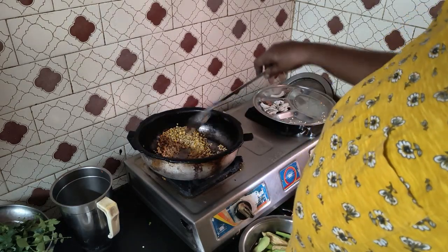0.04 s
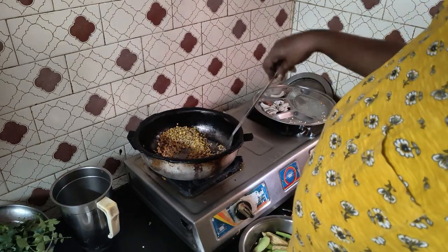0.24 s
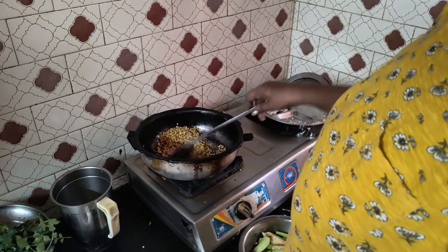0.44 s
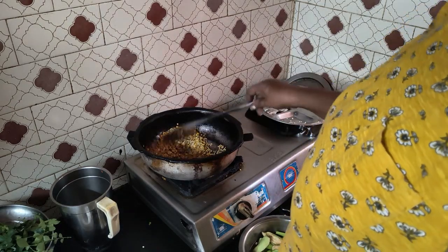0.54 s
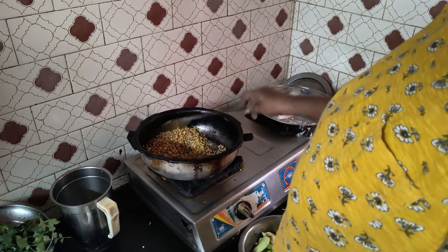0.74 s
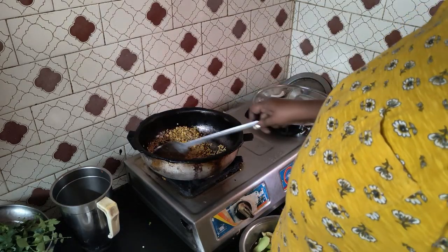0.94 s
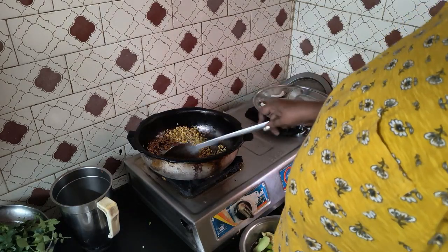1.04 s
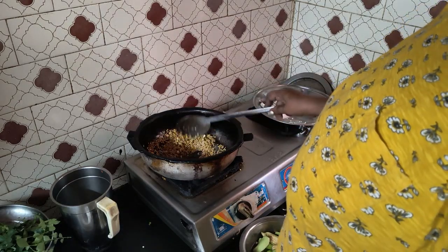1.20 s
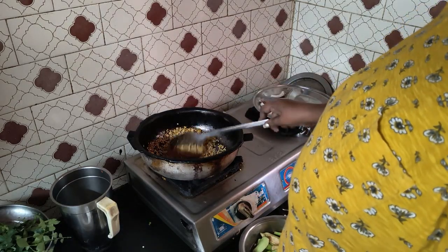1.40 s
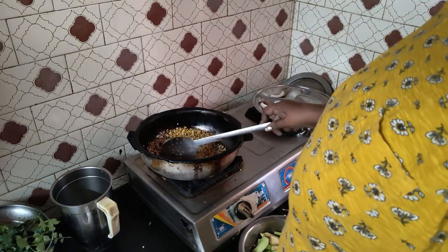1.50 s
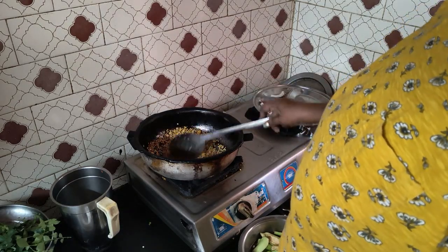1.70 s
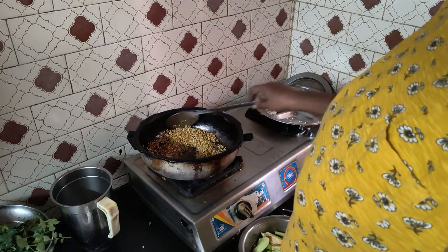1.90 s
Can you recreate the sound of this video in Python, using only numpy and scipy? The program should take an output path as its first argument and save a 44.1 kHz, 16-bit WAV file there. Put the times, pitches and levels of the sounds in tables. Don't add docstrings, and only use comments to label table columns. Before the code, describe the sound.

Steel ladle knocks and scrapes a metal pan while dry seeds rattle, over a faint stove hum

```python
import sys
import numpy as np
from scipy import signal
from scipy.fft import rfft, irfft, next_fast_len
from scipy.io import wavfile

SR = 44100
rng = np.random.default_rng(int(sys.argv[2]) if len(sys.argv) > 2 else 0)


def amplitude_ratio(level_db):
    exponent = np.asarray(level_db, float) / 20
    return 10 ** exponent


def unload_wav(signal):
    wavfile.write(
        sys.argv[1],
        SR,
        np.round(np.clip(np.atleast_2d(signal).T, -1, 1) * 32767).astype(np.int16),
    )


N = 85995
CONTACT_S = .003


def rms_one(x):
    return x / np.sqrt(np.mean(x ** 2) + 1e-20)


def in_time(rows):
    s, *columns = np.transpose(rows)
    return [np.interp(np.arange(N) / SR, s, c) for c in columns]


def at_hz(points, hz):
    points = np.array(points)
    return np.interp(np.log(hz), np.log(points[:, 0]), points[:, 1])


def sides(db):
    return amplitude_ratio(np.array([db / 2, -db / 2]))


def drift(rate):
    step = 40
    r = np.exp(-2 * step * np.pi * rate / SR)
    white = rng.standard_normal(N // step + 2002)
    slow = signal.lfilter([1], [1, -2 * r, r * r], white)[2000:]
    return np.interp(np.arange(N) / step, np.arange(len(slow)), rms_one(slow))


def decay(clicks, t60):
    return signal.lfilter([1], [1, -amplitude_ratio(-60 / (t60 * SR))], clicks + 1e-18)


def ring(clicks, hz, t60, lead):
    pole = amplitude_ratio(-60 / (t60 * SR)) * np.exp(2j * np.pi * hz / SR)
    z = signal.lfilter([1], [1, -pole], clicks + 1e-18)
    return np.array([(z * np.exp(.5j * lead)).imag, (z * np.exp(-.5j * lead)).imag])


def body(modes, clicks, stages):
    out = 0
    for k, (hz, db, t60, pan, lead) in enumerate(modes):
        for gain, share, extra in stages:
            tone = ring(clicks(k), hz, t60 * share + extra, lead)
            out = out + amplitude_ratio(db) * sides(pan)[:, None] * gain * tone
    return out


def ticks(rate, uneven_db):
    sizes = amplitude_ratio(uneven_db * np.minimum(rng.exponential(1, N), 5)) * rng.choice([-1, 1], N)
    return sizes * (rng.random(N) < rate / SR)


# pitch_hz, likeness (0 to 1)
LIKENESS = [(60, 0.64), (300, 0.91), (700, 0.4), (2000, 0.049), (5000, 0.033), (12000, 0.086)]


def bands(white, gain, count=18):
    out, edges = 0, (30 * 2 ** np.arange(0, 9.4, .5))[-count - 1:]
    for k, (low, high) in enumerate(zip(edges, edges[1:])):
        band = signal.butter(2, [low, high], "band", fs=SR, output="sos")
        mid, side = signal.sosfilt(band, white[k % 2])
        hz = np.sqrt(low * high)
        alike = np.clip(at_hz(LIKENESS, hz), -1, 1)
        stereo = np.sqrt(1 + alike) * mid + np.sqrt(1 - alike) * side * [[1], [-1]]
        out = out + gain(hz) * stereo
    return out


def kitchen(x):
    t60_s, wall_cut_hz = 0.37, 9500
    size = next_fast_len(N + SR)
    z = np.exp(-2j * np.pi * np.arange(size // 2 + 1) / size)
    dull = np.exp(-2 * np.pi * wall_cut_hz / SR)
    response = np.zeros((2, len(z)), complex)
    for k, lag in enumerate((rng.uniform(.008, .03, 12) * SR).astype(int)):
        loop = amplitude_ratio(-60 * lag / SR / t60_s) * (1 - dull) / (1 - dull * z) * z ** lag
        response[k % 2] += (-1) ** (k // 2) * loop / (1 - loop)
    return irfft(rfft(x, size) * response, size)[:, :N]


# pitch_hz, level_db
ROAR_COLOUR = [(30, -42), (65, -5.5), (140, -3.5), (400, -5.5), (1500, -23.5), (2800, -13.5), (6000, -28),
               (16000, -14)]
# pitch_hz, width_hz, level_db
BURNER_HUMS = [(71.2, 8, -67), (234.6, 7.1, -68.5), (270, 21, -65.5)]


def flame():
    together = drift(2.5)

    def gain(hz):
        return amplitude_ratio(at_hz(ROAR_COLOUR, hz) + 1.2 * (together + drift(10)))
    out = amplitude_ratio(-56) * rms_one(bands(rng.standard_normal((2, 2, N)), gain))
    for hz, width_hz, db in BURNER_HUMS:
        out = out + amplitude_ratio(db) * rms_one(ring(rng.standard_normal(N), hz, 7.1 / width_hz, 0.187))
    return out * sides(0.88)[:, None]


# start_s, level_db
PUSHES = [(0.0, -60), (0.102, -56.5), (0.146, -77), (0.244, -57.5), (0.57, -56.5), (0.732, -80),
          (0.792, -57), (0.9, -78), (1.112, -58), (1.14, -80), (1.292, -72), (1.492, -51.5), (1.672, -70),
          (1.738, -47), (1.786, -73), (1.95, -70)]


def stove():
    mode_hz, width_hz = 141.6, 7.6
    db, = in_time(PUSHES)
    white = [1, 1j] @ rng.standard_normal((2, N))
    z = signal.lfilter([1], [1, -np.exp(-np.pi * width_hz / SR)], white)
    steady = z / (np.abs(z) + 0.26 * np.std(z))
    tone = (steady * np.exp(2j * np.pi * mode_hz * np.arange(N) / SR)).real
    return amplitude_ratio(db) * rms_one(tone) * sides(1.8)[:, None]


# start_s, level_db, left_right_db
STIRRING = [(0.0, -54, 2.5), (.13, -51, 2), (.2, -58.5, 3), (.3, -42, 1), (.33, -33, 2.5), (.47, -38, 3.5),
            (.54, -45.5, 2.5), (.61, -45.5, 1.5), (.8, -56.5, 5), (.875, -39, 6.5), (1.06, -47.5, 2.5),
            (1.18, -34, 2.5), (1.36, -51, 1.5), (1.44, -33.5, 1), (1.665, -49.5, 1.5), (1.7, -38, 2),
            (1.81, -36, 2), (1.95, -55.5, 6)]
# pitch_hz, level_db (per Hz)
SEED_COLOUR = [(1200, -55), (2000, -28), (3200, -15.5), (4500, -9), (6200, -5), (8700, -10.5), (12000, -4),
               (16000, -14.5)]


def seeds():
    ticks_per_s, cycles, patchy_db, metal_db = 40000, 70.0, 1.5, -8.5
    db, pan = in_time(STIRRING)
    out, pitches = np.zeros((2, N)), np.linspace(36, 126, 70) ** 2
    clicks = ticks(ticks_per_s * amplitude_ratio(2.0 * drift(23)), 2.5)
    dealt = rng.integers(0, 70, N)
    leads = rng.uniform(-2.2, 2.2, 70)
    patches = [amplitude_ratio(patchy_db * drift(12.4)) for _ in range(10)]
    for k, hz in enumerate(pitches):
        height = patches[k // 7] * amplitude_ratio(at_hz(SEED_COLOUR, hz)) * hz ** .75
        out += height * ring(clicks * (dealt == k), hz, cycles / hz, leads[k])
    metal = sum(ring(clicks * (dealt == k), hz, 0.036, leads[k])
                for k, (hz, *_) in enumerate(BLADE_MODES[6:] + RIM_MODES[-4:]))
    return amplitude_ratio(db + 1.5 * drift(19)) * sides(pan) * (rms_one(out) + amplitude_ratio(metal_db) * rms_one(metal))


# start_s, level_db, pitch_hz, t60_s
CRACKED_SEEDS = [
    (.088, -51.5, 3770, .02),
    (.12, -55, 7800, 0.021),
    (1.206, -35, 4820, .03),
    (1.206, -36, 6070, .03),
    (1.63, -50, 9000, .02),
    (1.721, -33, 3830, 0.015),
    (1.7212, -30, 4370, .016),
    (1.742, -34, 4340, .03),
    (1.742, -36.5, 2040, 0.034),
]


def pips():
    out = np.zeros((2, N))
    for s, db, hz, t60 in CRACKED_SEEDS:
        click = np.zeros(N)
        click[int(s * SR)] = amplitude_ratio(db + 4.5)
        out += ring(click, hz, t60, 0.42) - ring(click, hz, t60 / 4, 0.4)
    return out


# start_s, level_db, pitch_hz (at first), t60_s
LANDINGS = [
    (.39, -42, 900, .15),
    (.492, -44, 954, 0.24),
    (.763, -53.5, 966, 0.14),
    (1.083, -27, 900, 0.088),
    (1.139, -34, 1006, 0.17),
    (1.208, -51, 946, 0.14),
    (1.419, -31, 935, 0.24),
    (1.7415, -35.5, 958, 0.22),
    (1.8, -43.5, 918, 0.21),
]


def scoops():
    sag_octaves, sag_s, waver_hz = .6, 0.0294, 44.4
    t, out = np.arange(N) / SR, np.zeros((2, N))
    low = signal.butter(2, waver_hz, fs=SR, output="sos")
    waver = signal.sosfilt(low, rng.standard_normal((2, N)))
    waver = 0.73 + (waver[0] + 1j * waver[1]) / np.std(waver) * 0.64
    for s, db, hz, t60 in LANDINGS:
        age = np.maximum(t - s, 0)
        pitch = hz * 2 ** (-sag_octaves * age / sag_s * np.exp(1 - age / sag_s))
        height = amplitude_ratio(db - 60 * age / t60) * np.minimum(age / CONTACT_S, 1)
        z = waver * np.exp(2j * np.pi * np.cumsum(pitch) / SR) * height
        out += [(z * np.exp(0.3j)).real, (z * np.exp(-0.3j)).real]
    return out * sides(0.6)[:, None]


# start_s, level_db
DRAGGING = [(0.0, -66.5), (.3, -72), (.35, -42), (.47, -47), (.53, -58.5), (.62, -74), (.75, -75),
            (.78, -63), (.9, -68), (1.06, -78), (1.1, -42), (1.22, -58.5), (1.3, -107), (1.42, -49.5),
            (1.57, -69.5), (1.7, -63.5), (1.77, -50), (1.95, -85)]
# pitch_hz, level_db (per Hz)
GRIT_COLOUR = [(300, 4), (700, 9.5), (1500, 3.5), (3000, 4), (6000, -39), (12000, 1)]


def drag():
    slips_per_s, rim_db, blade_db, grit_db = 2500, -7.5, -4, 4.5
    db, = in_time(DRAGGING)
    slips = ticks(slips_per_s * amplitude_ratio(2.1 * drift(17)), 2.5)
    sign = rng.choice([-1, 1], (14, N))
    parts = (RIM_MODES, rim_db), (BOWL_MODES + BASE_MODES, 0), (BLADE_MODES, blade_db)
    metal = sum(amplitude_ratio(g) * rms_one(body(modes, lambda k: slips * sign[k], [(1, 0.28, 0.0023)]))
                for modes, g in parts)
    rough = slips * sign[:4].reshape(2, 2, N) + 0.43 * rng.standard_normal((2, 2, N))
    grit = rms_one(bands(rough, lambda hz: amplitude_ratio(at_hz(GRIT_COLOUR, hz)), count=12))
    return amplitude_ratio(db) * (metal + amplitude_ratio(grit_db) * grit)


KNOCK_TIMES = [.2097, .2295, .312, .4905, .761, 1.0778, 1.139, 1.205, 1.399, 1.4178, 1.64, 1.7218, 1.7415,
               1.772, 1.801]
# level_db, centre_hz, left_right_db, burst_db (what follows the snap)
KNOCK_CRACKS = [(-19, 3470, -0.7, 0.1), (-40, 3200, 10.5, 13.5), (-19.5, 6050, 2.5, 3), (-48.5, 1030, 1, 5),
                (-59.5, 1500, 1, 9), (-18.5, 4400, 2, 0.1), (-50, 3700, 6.5, 0.1), (-44, 5200, 9, 7.5),
                (-69, 6000, -5, 0.1), (-12, 5050, 1.5, -2.5), (-75, 2100, -5, 0.1), (-39.5, 4900, -0.5, -3),
                (-34.5, 1800, 1.5, -3), (-63, 6100, 7, 0.1), (-33.5, 5600, 3, -3)]


def cracks():
    snap_db, snap_t60_s = 6.5, 0.0026
    burst_t60_s, tail_db, tail_t60_s = 0.069, -3, 0.078
    slope_db, top_hz = 5.5, 11100
    at = (np.array(KNOCK_TIMES) * SR).astype(int)
    db, centre_hz, pan, burst_db = np.transpose(KNOCK_CRACKS)

    def gain(hz):
        clicks, after = np.zeros((2, N)), np.zeros(N)
        after[at] = amplitude_ratio(burst_db)
        level = amplitude_ratio(db - slope_db * np.log2(hz / centre_hz) ** 2 - 38.5)
        clicks[:, at] = level * sides(pan) * np.sqrt(SR / hz) * 10
        slow = (hz / 4000) ** -.3
        snap = amplitude_ratio(snap_db) * decay(clicks, snap_t60_s * slow)
        burst = decay(clicks * after, burst_t60_s * slow)
        tail = amplitude_ratio(tail_db) * decay(clicks * after, tail_t60_s * slow)
        return snap + burst + tail
    noise = amplitude_ratio(8.5) * bands(rng.standard_normal((2, 2, N)), gain, count=12)
    return signal.sosfilt(signal.butter(1, top_hz, fs=SR, output="sos"), noise)


# rim_db, bowl_db, blade_db, base_db, rim_line_db (a rim mode near 1178 Hz
KNOCK_RINGS = [(-14, -45, -45, -34, -60), (-69, -37, -48, -35.5, -68), (-27.5, -35.5, -46, -35.5, -39),
               (-61.5, -36.5, -61, -38.5, -60), (-75, -63, -81, -60, -74), (-39, -28.5, -20, -29.5, -68),
               (-68, -38.5, -39, -34, -65), (-80, -49, -56, -40, -70), (-77, -78, -80, -66, -75),
               (-57, -25, -40, -23.5, -28.5), (-72, -69, -56, -66, -57.5), (-72, -88, -55, -70, -60),
               (-74, -39.5, -42, -36, -68), (-79, -74.5, -41.5, -70, -70), (-70, -40.5, -51, -44, -67)]
CHATTER = [-38, -35, -27.5, -36.5, -38]
# pitch_hz, level_db, t60_s, left_right_db, lead_rad (left leads)
RIM_MODES = [(932, -12, .24, -6, 2.1), (1169, -13, .22, -9, 1.4), (1406, -25, .14, 4, -.8),
             (1894, -7, .15, -8, -.9), (1941, 0, .18, -4, -1.4), (1947, -30, .4, -4, -1.4),
             (2038, -8, .25, 2, -2), (2355, -17, .08, 2, .3), (2960, -19, .2, 6, .2),
             (2995, -17, .2, -8, 1.8), (4170, -14, .13, 10, -.1), (4983, -21, .09, -8, .1),
             (5730, -28, .2, 2, 1), (6320, -28, .25, 11, -1.2)]
BOWL_MODES = [(525, -16.5, 0.073, 13, -0.11), (597, -10, 0.15, 1, -0.63), (698, -8, 0.12, -6.5, 0.64),
              (744.5, -7, 0.092, 0, 0.51), (831.5, 0, 0.074, 3, -0.19), (984, 3, 0.026, -7.5, 0.83),
              (1321, -16, 0.27, -5, 1.9)]
BLADE_MODES = [(2930, -16, .08, 10, -2), (3362, -8, .1, -6, -.9), (3501, -3, .16, 2, -.5),
               (3624, -5, .12, -2, -2.2), (3818, -6, .12, 4, .7), (3950, -10, .09, 2, .6),
               (4200, -9, .11, -2, -1.6), (4420, -13, .09, -1, -3.1), (4770, -14, .1, -4, 1.6),
               (5860, -14, .12, 1, -.3), (5960, -12, .07, 8, -.3), (6290, -13, .07, 12, -.4),
               (6460, -16, .08, 5, .4)]
BASE_MODES = [(262, -17, .18, 1, .1), (290, -17, .2, 1, .2), (369, -20, .5, -1, .1), (451, -14, .22, 3, .1)]
RIM_LINE_MODES = [(1178, -1.13, 0.17, 4, 1.2)]


def rings():
    spread_db, chatter_t60_s = 1.0, 0.1
    early, early_share = amplitude_ratio(-3.5), 0.29
    stages = [(1, 1, 0), (early, early_share, 0), (-1 - early, 0, CONTACT_S)]
    at, out = (np.array(KNOCK_TIMES) * SR).astype(int), 0
    noise = rng.standard_normal((14, N))
    parts = RIM_MODES, BOWL_MODES, BLADE_MODES, BASE_MODES, RIM_LINE_MODES
    for modes, db, chatter_db in zip(parts, np.transpose(KNOCK_RINGS), CHATTER):
        count = len(modes)
        clicks = np.zeros((count, N))
        clicks[:, at] = amplitude_ratio(db + spread_db * rng.standard_normal((count, len(at))))
        clicks = clicks + amplitude_ratio(chatter_db) * noise[:count] * decay(clicks, chatter_t60_s)
        out = out + body(modes, lambda k: clicks[k], stages)
    return out


def scene():
    high = signal.butter(4, 258, "high", fs=SR, output="sos")
    pan = signal.sosfilt(high, rings() + cracks() + drag() + seeds())
    pan = pan + scoops() + pips()
    return pan + amplitude_ratio(-15) * kitchen(pan) + flame() + stove()


def roll_off(x):
    return signal.sosfilt(signal.butter(12, 16810, fs=SR, output="sos"), x)


# pitch_hz, level_db
MICROPHONE_CURVE = [(9000, -1.31), (9900, -4.5), (10500, -13), (13300, -13.5), (14100, -9), (14700, 3.5),
                    (15700, 2.5)]


def record(dry):
    cutoff_hz = 15770
    size = next_fast_len(N)
    hz = np.arange(1, size // 2 + 2) * SR / size
    response = amplitude_ratio(at_hz(MICROPHONE_CURVE, hz)) * (hz < cutoff_hz)
    mix = irfft(rfft(dry, size) * response, size)[:, :N]
    return roll_off(mix)


dry = scene()
out = record(dry)
unload_wav(out)
```